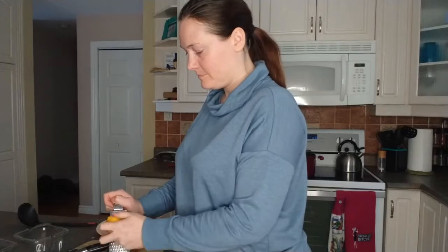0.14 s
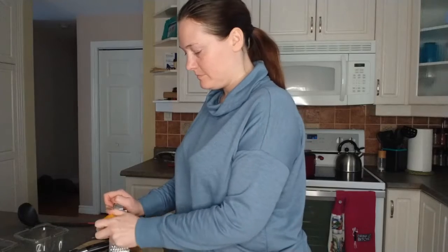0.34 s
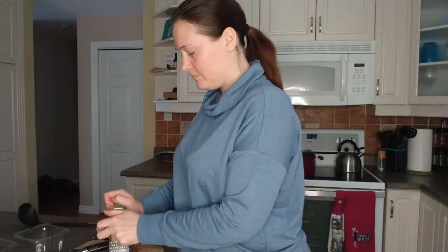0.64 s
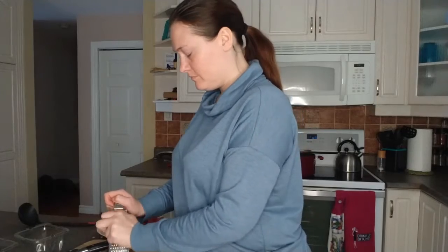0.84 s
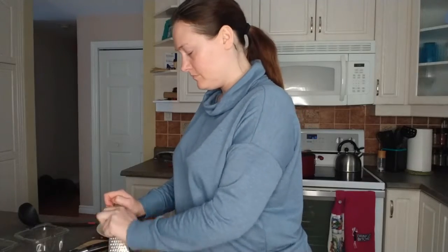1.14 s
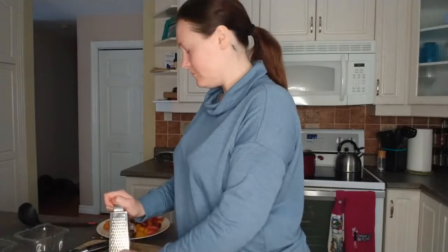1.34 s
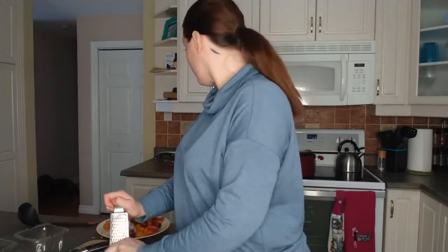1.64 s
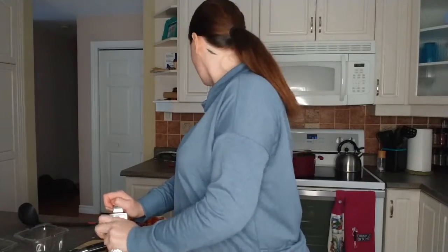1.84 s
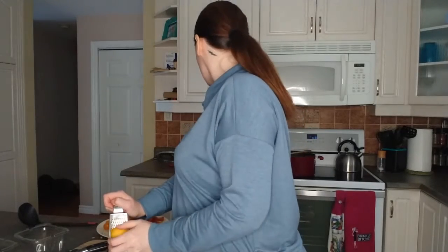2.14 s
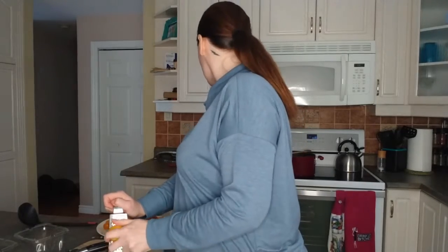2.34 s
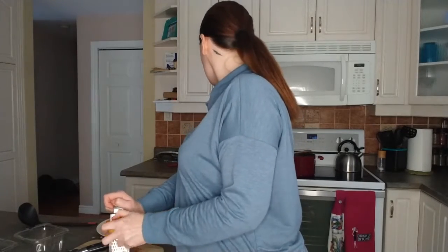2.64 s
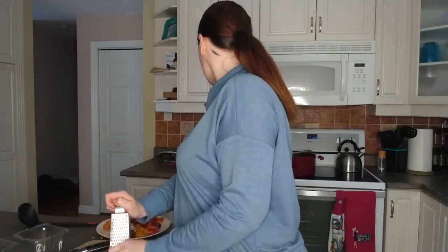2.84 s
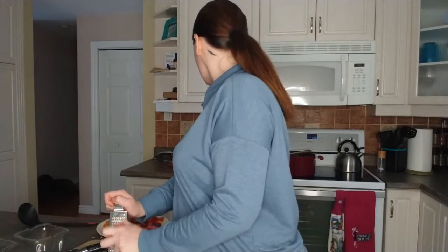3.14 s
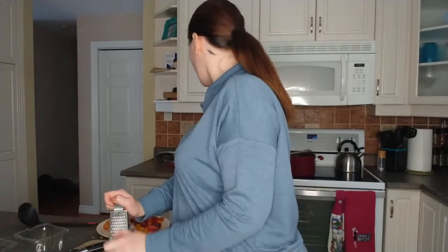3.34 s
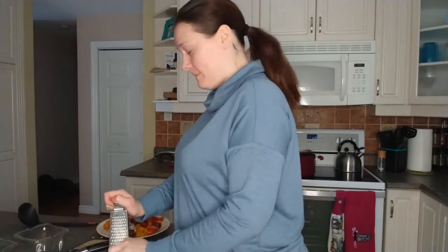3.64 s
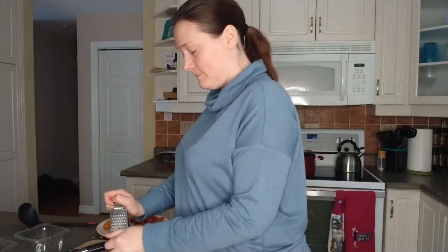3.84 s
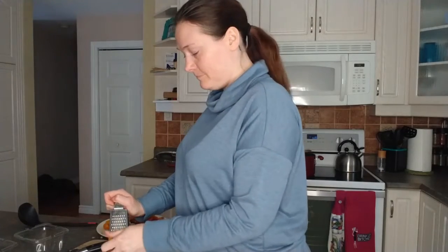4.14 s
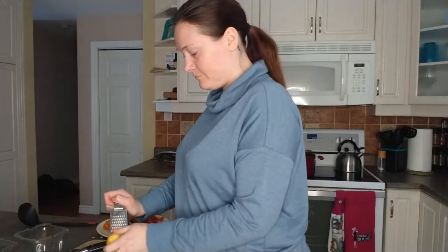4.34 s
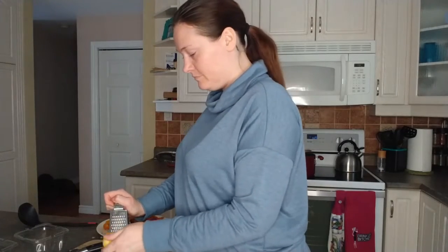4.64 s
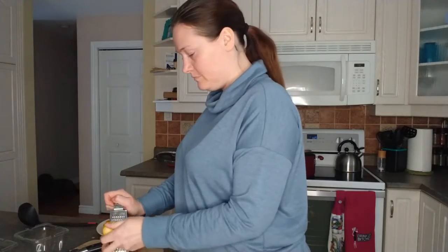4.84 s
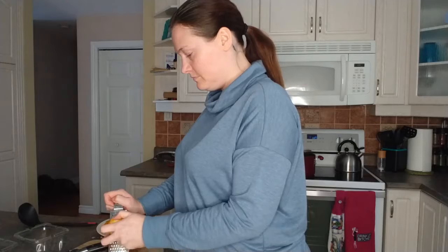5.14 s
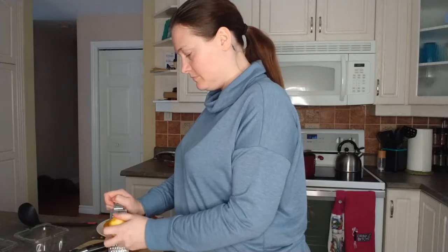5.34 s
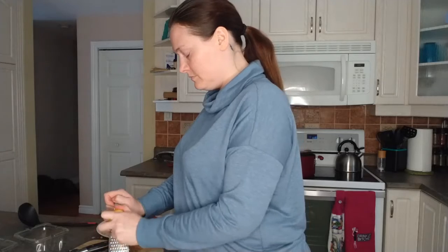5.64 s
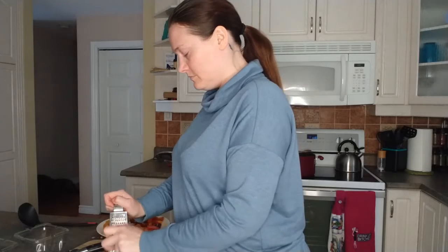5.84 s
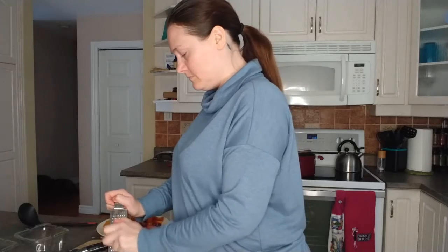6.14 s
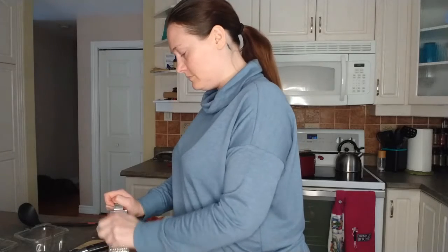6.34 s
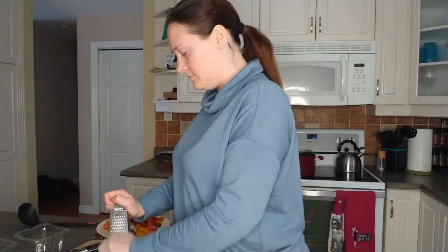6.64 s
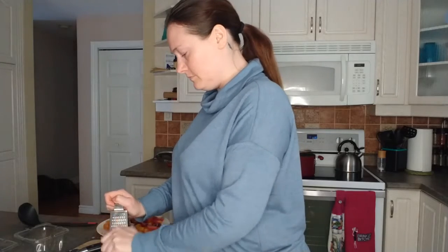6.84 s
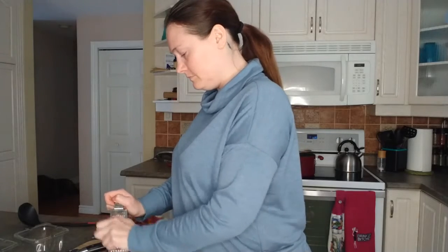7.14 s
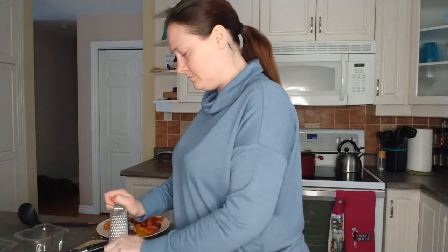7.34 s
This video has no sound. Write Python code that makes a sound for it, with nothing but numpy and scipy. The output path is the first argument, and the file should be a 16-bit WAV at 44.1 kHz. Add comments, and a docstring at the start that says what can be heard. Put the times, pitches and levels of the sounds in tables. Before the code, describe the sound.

Bursts of short, crackly scrapes of citrus peel on a metal grater, with soft knocks and a low kitchen hum between them.

```python
"""A hard-walled kitchen: a lemon is zested on a steel box grater that stands on the counter.
Quick downward strokes come in three groups; one stroke stalls and goes on. The teeth tear the peel
in a dense crackle and catch row by row; the sheet steel colours the rasp and the counter booms under
each push. The room rings after every stroke. Beneath lie a dull rustle, the faint rub of the fruit
sliding back up the teeth, and a low hum and hiss."""
import sys
import numpy as np
from scipy import signal
from scipy.fft import rfft, irfft
from scipy.io import wavfile

SR = 44100
rng = np.random.default_rng(int(sys.argv[2]) if len(sys.argv) > 2 else 0)


def materialize(psi):
    """Save the field psi as 16-bit PCM at rate SR to the path in sys.argv[1].

    A 1-D psi becomes a single channel; in a 2-D psi each row is a channel.
    """
    bounded = np.clip(np.atleast_2d(psi).T, -1, 1)
    quanta = np.round(bounded * 32767).astype(np.int16)
    wavfile.write(sys.argv[1], SR, quanta)


N = 330309
TIME = np.arange(N) / SR
FREQS = np.fft.rfftfreq(N, 1 / SR)

# Downward strokes: t of hardest push/s, build-up/s, run-out/s, pressure/dB, landing below it/dB,
# row catch re pressure/dB, tooth-row rate/Hz, force on counter/dB, judder's 2nd harmonic/dB, body/dB
STROKES = [ (1.035, 0.094, 0.057, -33.5, 11.5, 5.5, 42, -37, -1.5, 2.5),
           (1.349, 0.078, 0.031, -30.5, 20, 5, 44.24, -36.5, 1, 2),
           (1.648, 0.045, 0.063, -30.5, 4.5, 5, 41.9, -37.5, 3, -1),
           (2.876, 0.084, 0.066, -31, 26.5, -5.5, 43.4, -40, 8, 1.5),
           (3.272, 0.067, 0.059, -32.5, 8.5, 5, 44.4, -35.5, -0.5, -1),
           (3.667, 0.076, 0.058, -31, 12.5, 6.5, 48.3, -28.5, -5, -0.5),
           (5.829, 0.1, 0.066, -34.5, 18, -1.5, 41, -35.5, 1.5, 1.5),
           (5.938, 0.022, 0.058, -37, 8, 0.5, 42.2, -36, -2.5, 2.5),
           (6.257, 0.052, 0.073, -31, 4.5, 6, 49.3, -28, -3.5, -1.5),
           (6.611, 0.073, 0.066, -29, 7.5, 4, 40.9, -35, -4.5, -2.5),
           (6.904, 0.048, 0.079, -29, 9, 5.5, 39.87, -36.5, 6, -3),
           (7.282, 0.052, 0.07, -30.5, 6.5, 5.5, 48.3, -28, -2, -1.5)]
# Fruit or finger touches the grater: t/s, tick level/dB, thud level/dB
TOUCHES = [(0.221, -53, -33.5), (0.921, -50, -49), (1.887, -49, -31.5), (2.385, -54, -56),
           (2.797, -53, -54), (3.552, -47.5, -28.5), (4.76, -64, -51.5), (4.908, -73, -43.5),
           (5.696, -45.5, -28.5), (6.191, -34.5, -29), (6.518, -34.5, -27), (6.841, -39, -37),
           (7.214, -36, -55)]


def amp(db):
    """Decibels to gain."""
    return 10 ** (np.asarray(db) / 20)


def unit(x):
    """Scales to rms 1."""
    return x / np.sqrt(np.mean(x ** 2) + 1e-20)


def curve_at(points, hz):
    """Reads a curve along a log-frequency axis."""
    f, value = np.transpose(points)
    return np.interp(np.log(hz + 1), np.log(f + 1), value)


def eq(x, gain):
    """Filters by a gain given at every frequency."""
    return irfft(rfft(x) * gain, N)


def convolve(x, response):
    """Plays one signal through a left and a right response."""
    return signal.fftconvolve(x[None], response, axes=1)[:, :N]


def wobble(hz):
    """Smooth random modulation of rms 1, rolling off around hz."""
    return unit(eq(rng.standard_normal(N), np.exp(-(FREQS / hz) ** 2)))


def diffuse(pair):
    """Makes two unrelated signals alike in the bass, as at two close microphones."""
    # Left-right likeness of diffuse sound: f/Hz, correlation/0-1
    likeness = [(60, 1), (500, 0.48), (1000, 0), (2000, 0)]
    a, b = rfft(pair)
    same = np.clip(curve_at(likeness, np.fft.rfftfreq(pair.shape[1], 1 / SR)), 0, 1)
    return irfft(np.array([a, same * a + np.sqrt(1 - same ** 2) * b]), pair.shape[1])


def room_tone(air_db=-55, hum_hz=240, hum_db=-66):
    """Low rumble and hiss of the house, and the hum of an appliance, leaning left."""
    # Spectrum of the steady bed: f/Hz, relative level/dB
    air = [(20, -40), (50, -1.5), (78, 0), (130, -4.5), (200, -8), (320, -14.5), (600, -20.5), (1100, -25),
           (4500, -29), (5400, -26.5), (8000, -34), (10400, -28.5), (13000, -34), (14700, -33)]
    # Its stereo tilt: f/Hz, left over right/dB
    air_left = [(30, -11), (75, 7), (130, 9.5), (1000, 4), (8000, 1)]
    spectrum_db = curve_at(air, FREQS) + np.outer([.5, -.5], curve_at(air_left, FREQS))
    bed = eq(diffuse(rng.standard_normal((2, N))), amp(spectrum_db))
    hum = np.sqrt(2) * np.sin(2 * np.pi * hum_hz * TIME) * amp([[2], [-4]])
    return amp(air_db) * unit(bed) + amp(hum_db) * hum


def rustle_and_slide(low_hz=220, high_hz=520, slide_db=-24, slide_hz=3200, flutter_db=4, flutter_hz=35):
    """A soft, dull rustle, carrying the faint brighter rub of the fruit sliding back up the grater."""
    # Fader ride of rustle and rub: t/s, level/dB
    ride = [(0, -60.5), (0.9, -62), (1.9, -61), (2.7, -64), (4.2, -62.5), (5.2, -80), (5.42, -63),
            (5.65, -77)]
    top = 1 / (1 + (FREQS / high_hz) ** 4) + amp(slide_db) / (1 + (FREQS / slide_hz) ** 4)
    band = top * FREQS ** 2 / (FREQS ** 2 + low_hz ** 2)
    flutter = amp(flutter_db * np.tanh(wobble(flutter_hz)))
    rub = eq(diffuse(rng.standard_normal((2, N))), band)
    return amp(np.interp(TIME, *np.transpose(ride))) * unit(rub * flutter)


def room_response(direct_db=-4.0, early_db=-1, early_s=0.018, tail_db=-2, gap_s=0.0044):
    """Direct sound, early echoes from counter and cupboards, then a darkening tail."""
    # Reverb time of the kitchen: f/Hz, t60/s
    decay = [(100, 0.7), (500, 0.62), (2000, 0.56), (4500, 0.56), (8000, 0.48), (15000, 0.28)]
    t = TIME[:SR]
    signs = rng.choice([-1., 1.], (2, 2, SR))
    late_taps, early_taps = signs * (rng.random((2, 2, SR)) < 4000 / SR)  # 4000 echoes a second
    hz, frame_s, spectra = signal.stft(diffuse(late_taps * (t > gap_s)), SR, nperseg=256)
    fade = amp(-60 * frame_s / curve_at(decay, hz)[:, None])
    tail = signal.istft(spectra * fade, SR, nperseg=256)[1][:, :SR]
    early = diffuse(early_taps * np.exp(-t / early_s))
    response = (amp(tail_db) * unit(tail) + amp(early_db) * unit(early)) / np.sqrt(SR)
    response[[0, 1], [0, 7]] += amp(direct_db)  # reaches the left 7 samples ahead
    return response


def kitchen(x, parts=4, travel_hz=9):
    """As the fruit travels, different parts of the steel radiate, each with its own echoes."""
    turns = travel_hz * TIME + np.arange(parts)[:, None] / parts
    shares = np.maximum(np.cos(2 * np.pi * turns), 0)
    shares /= np.linalg.norm(shares, axis=0)  # equal-power crossfade
    return sum(convolve(x * share, room_response()) for share in shares)


def counter_force(push_s=0.045, lag_s=0.01816, late_speed=0.949, thud_db=5, rock_hz=82, rock_s=0.013):
    """Tooth rows judder into the counter; each touch rocks the grater on its feet."""
    force = np.zeros(N)
    rumble = wobble(hz=100)
    for (s, *_, row_hz, db, second_db, _), start in zip(STROKES, rng.random(len(STROKES))):
        near = slice(round(s * SR) - SR // 6, round(s * SR) + SR // 6)
        t = TIME[near] - s - lag_s  # the weight peaks late in the stroke, when the fruit has slowed
        phase = 2 * np.pi * (late_speed * row_hz * t + start)
        judder = np.sin(phase) + amp(second_db) * np.sin(2 * phase) + rumble[near]
        force[near] += amp(db) * np.exp(-.5 * (t / push_s) ** 2) * judder
    rocking = TIME / rock_s * np.exp(-TIME / rock_s) * np.sin(2 * np.pi * rock_hz * TIME)
    for s, _, db in TOUCHES:
        start = round(s * SR)
        force[start:] += amp(db + thud_db) * rocking[:N - start]
    return force


def counter_boom(force, attack_s=0.0058, low_cut_hz=38):
    """The force sets the low modes of the counter swinging, with a softened attack."""
    # Modes of the counter and the room around it: f/Hz, t60/s, left level/dB, right level/dB
    low_modes = [(49.6, 0.33, -3.5, 0.5), (57.06, 1, 5.5, -28.5), (78.67, 0.8, 5.5, -47),
                 (81.4, 0.23, -5.5, -9.5), (94.1, 0.28, 4, -10)]
    t = TIME[:2 * SR]
    ringing = sum(amp([[left], [right]]) * amp(-60 * t / t60) * np.sin(2 * np.pi * hz * t)
                  for hz, t60, left, right in low_modes)
    attack = 1 - np.exp(-t / attack_s)
    boom = convolve(force, ringing * attack * 100 / SR)
    return signal.sosfilt(signal.butter(4, low_cut_hz, "high", fs=SR, output="sos"), boom)


def peel_crackle(per_s=9000, spread_db=4.0):
    """Tiny ruptures of peel cells, of very uneven size."""
    size = amp(spread_db * np.minimum(rng.exponential(1, N), 4))
    return unit(size * rng.choice([-1, 1], N) * (rng.random(N) < per_s / SR))


def touching(tick_s=0.0083, pat_db=-20, pat_hz=650, pat_s=0.013):
    """Light contacts: a brief crunch of the teeth and a dull pat of the soft fruit."""
    ticks, pats = np.zeros((2, N))
    for s, tick_db, thud_db in TOUCHES:
        start = round(s * SR)
        ticks[start:] += amp(tick_db) * np.exp(-TIME[:N - start] / tick_s)
        pats[start:] += amp(thud_db + pat_db) * np.exp(-TIME[:N - start] / pat_s)
    dull_noise = unit(eq(rng.standard_normal(N), 1 / (1 + (FREQS / pat_hz) ** 2)))
    return ticks * peel_crackle() + pats * dull_noise


def scraping(land_s=0.0053, lift_s=0.028, ease_db=9.5, snag_s=0.0033, bite_db=1.34, bite_hz=260):
    """Peel crackles under the arching pressure of each stroke, surging as each tooth row catches."""
    force = np.zeros(N)
    for s, build_s, run_s, db, landing_db, catch_db, row_hz, *_ in STROKES:
        near = (TIME > s - build_s) & (TIME < s + run_s)
        t = TIME[near] - s
        arch_db = db - np.where(t < 0, landing_db * (t / build_s) ** 2, ease_db * (t / run_s) ** 2)
        contact = np.clip(np.minimum((t + build_s) / land_s, (run_s - t) / lift_s), 0, 1)
        from_row_s = ((t * row_hz + .5) % 1 - .5) / row_hz
        catches = amp(catch_db) * np.exp(-.5 * (from_row_s / snag_s) ** 2)
        force[near] += amp(arch_db) * np.sqrt(contact) * np.hypot(1, catches)
    bites = amp(bite_db * wobble(bite_hz))  # single teeth bite and slip
    return force * bites * peel_crackle()


def grater(force, body_hz=1100):
    """The steel box radiates the force and rings; each grip wakes its hollow body differently."""
    # Tone of peel tearing on thin steel: f/Hz, relative level/dB
    rasp_tone = [(35, 0), (110, 3), (310, -3), (700, 1), (1000, 0), (1700, -2), (2900, -4), (4000, 0.5),
                 (5500, 0), (7000, -5.5), (9000, -7.5), (11500, -8), (14500, -7), (16000, -13.5)]
    # Resonances of the box: f/Hz, width/Hz, level/dB
    steel_modes = [(172, 27, 3.5), (254, 51, -1.5), (439, 26, 2.5), (510.4, 31, 5), (675, 29, -1.5),
                   (766, 38, 2.5), (1263, 77, -0.5), (2320, 440, 1), (3285, 270, -2.5), (3790, 115, -5.5),
                   (5370, 110, -13)]
    rings = sum(amp(db) / (1 + 2j * (FREQS - hz) / width) for hz, width, db in steel_modes)
    response = amp(curve_at(rasp_tone, FREQS)) * (1 + rings)
    rasp = eq(force, response / np.sqrt(np.mean(abs(response) ** 2)))
    body = eq(rasp, 1 / (1 + (FREQS / body_hz) ** 4))
    stroke_s, *_, body_db = np.transpose(STROKES)
    body_gain = amp(np.interp(TIME, stroke_s, body_db))
    return rasp + (body_gain - 1) * body


def scene(zest_db=0.89, lean_left_db=0.68):
    """The mix: the grater in its room, over the counter's boom, the rustle and the room tone."""
    balance = amp([[zest_db + lean_left_db], [zest_db - lean_left_db]])
    zesting = kitchen(grater(scraping() + touching())) * balance
    return zesting + counter_boom(counter_force()) + rustle_and_slide() + room_tone()


def record(dry, dropout_s=1.867, dropout_width_s=0.027, cutoff_hz=15800):
    """Microphone ports colour the sound; it drops out for a moment, and the very top is cut."""
    # A peak and a notch for each port, left then right: f/Hz, width/Hz, gain/dB
    ports = [
        [(5900, 240, 3.5), (11800, 640, -26)],
        [(5180, 220, 4.5), (6120, 365, -29)],
    ]
    colour_db = [sum(db * np.exp(-((FREQS - hz) / width) ** 2) for hz, width, db in port)
                 for port in ports]
    dropout = 1 - np.exp(-((TIME - dropout_s) / dropout_width_s) ** 2)
    high_cut = signal.firwin(511, cutoff_hz, window=("kaiser", 9), fs=SR)
    return signal.oaconvolve(eq(dry, amp(colour_db)) * dropout, high_cut[None], "same")


dry = scene()
out = record(dry)
materialize(out)
```